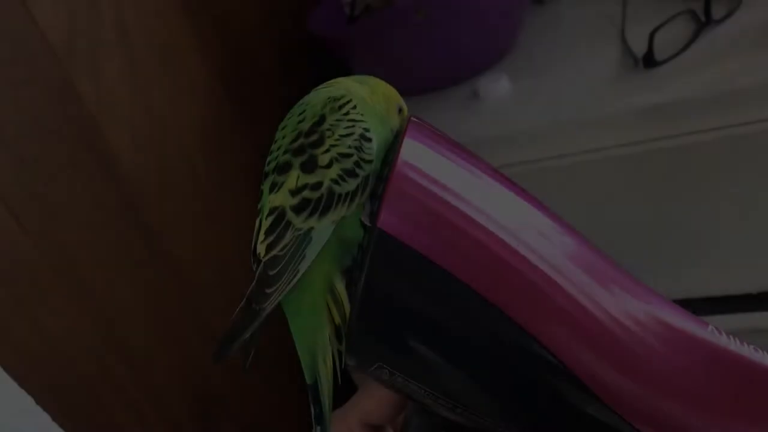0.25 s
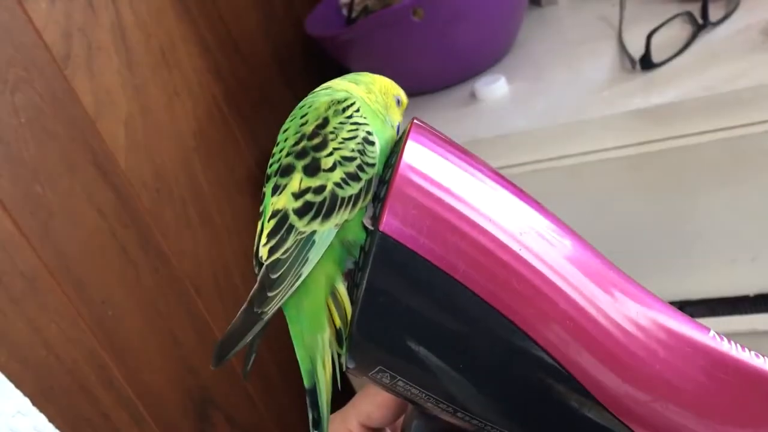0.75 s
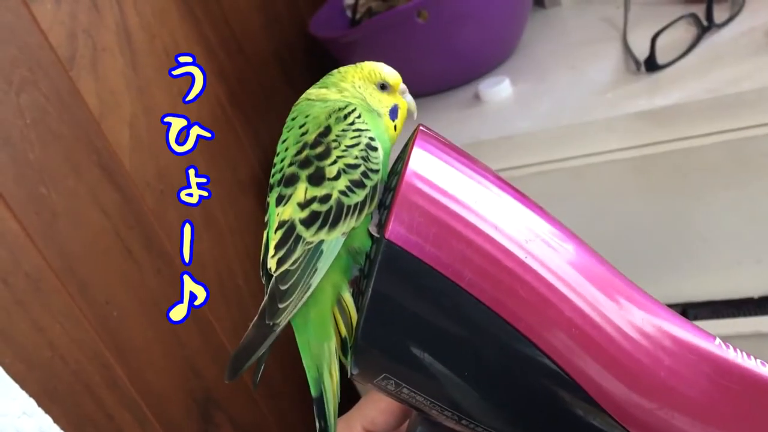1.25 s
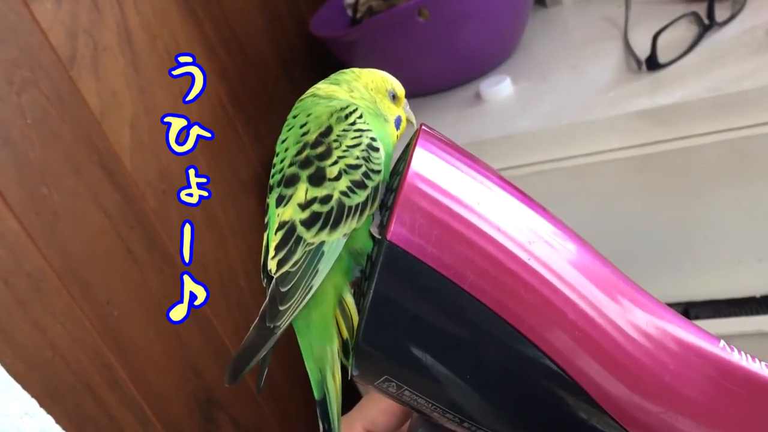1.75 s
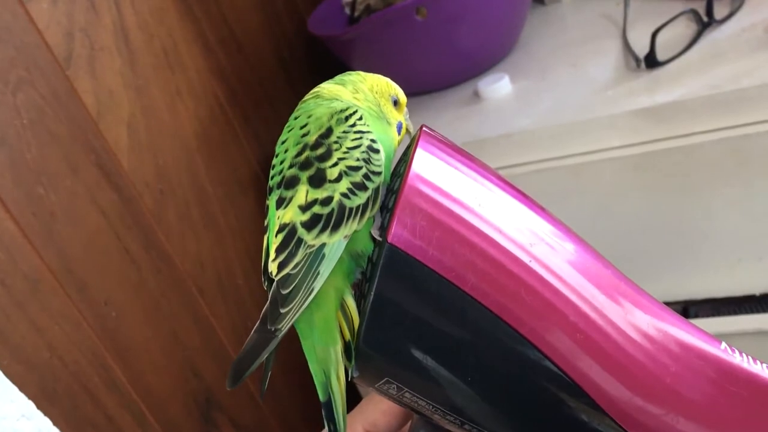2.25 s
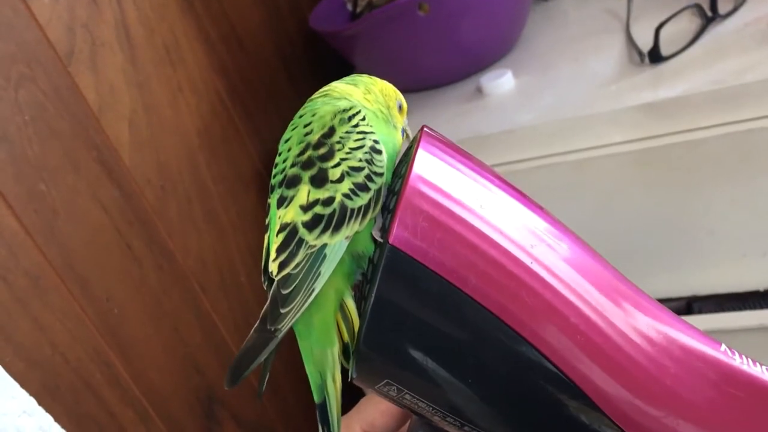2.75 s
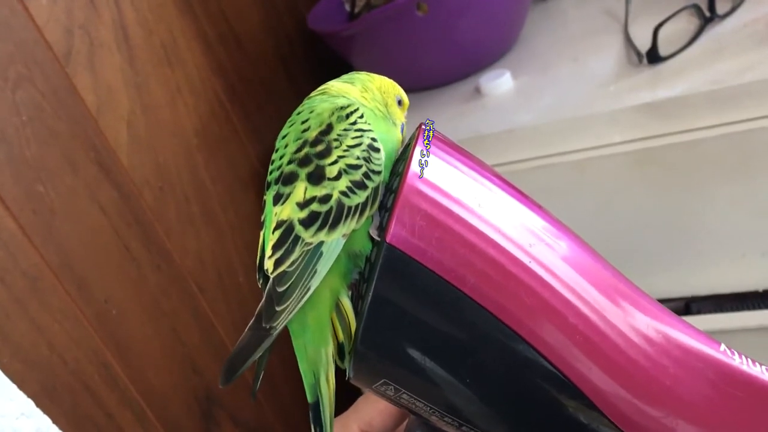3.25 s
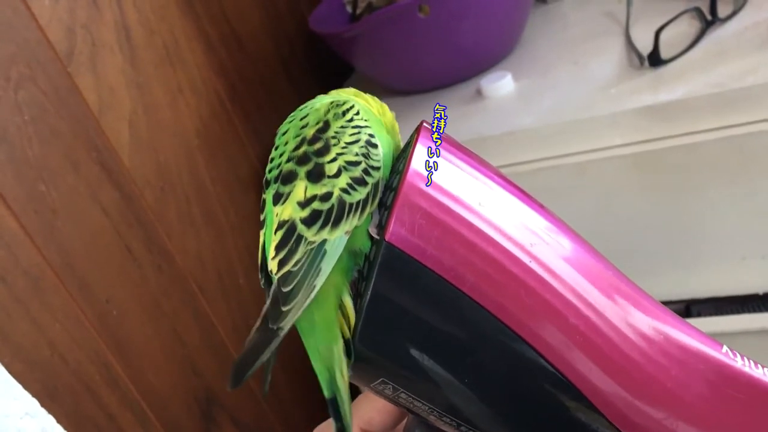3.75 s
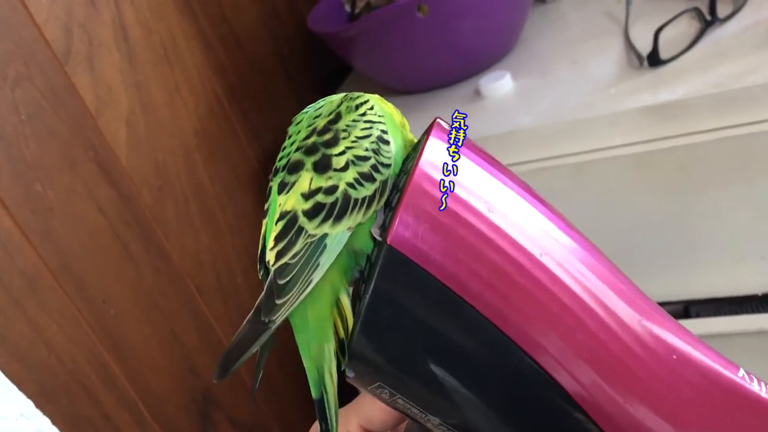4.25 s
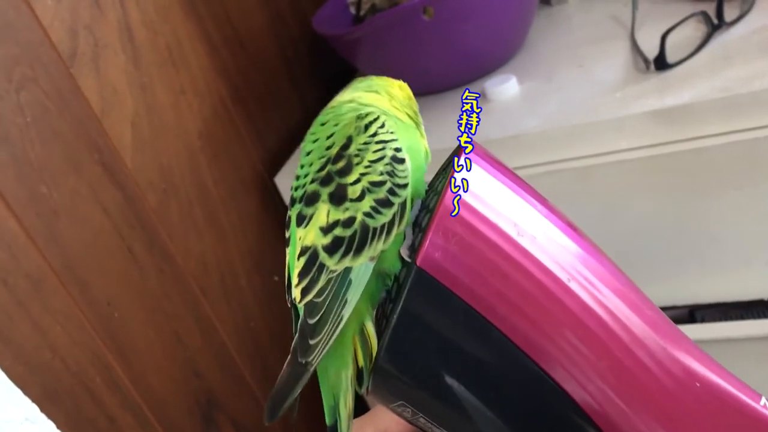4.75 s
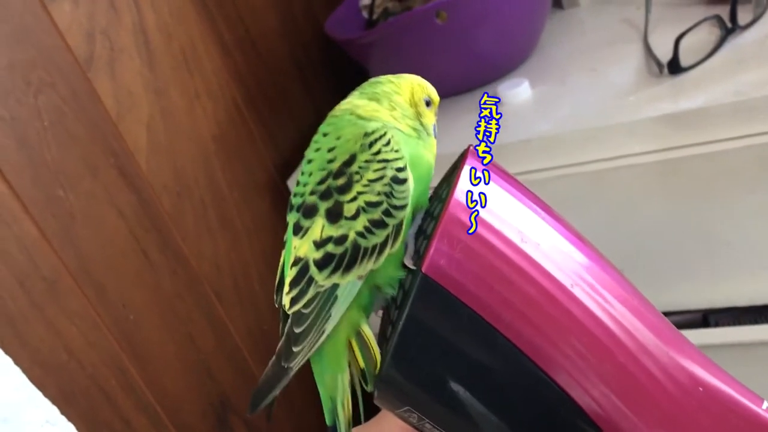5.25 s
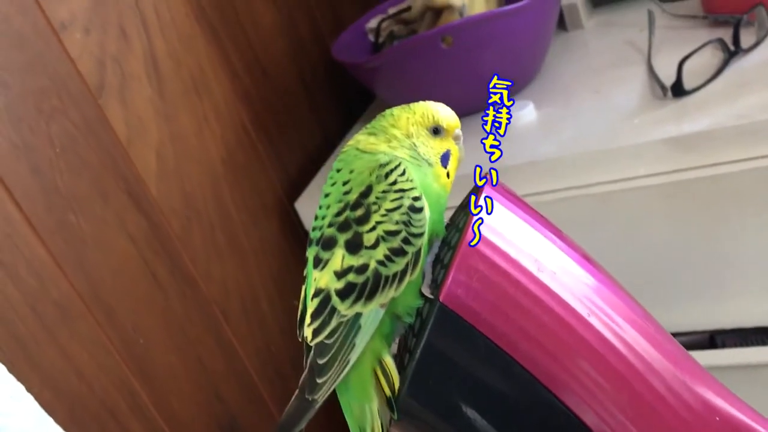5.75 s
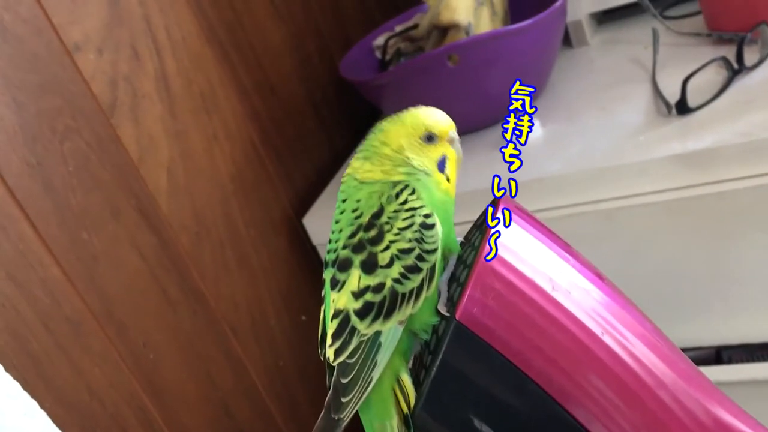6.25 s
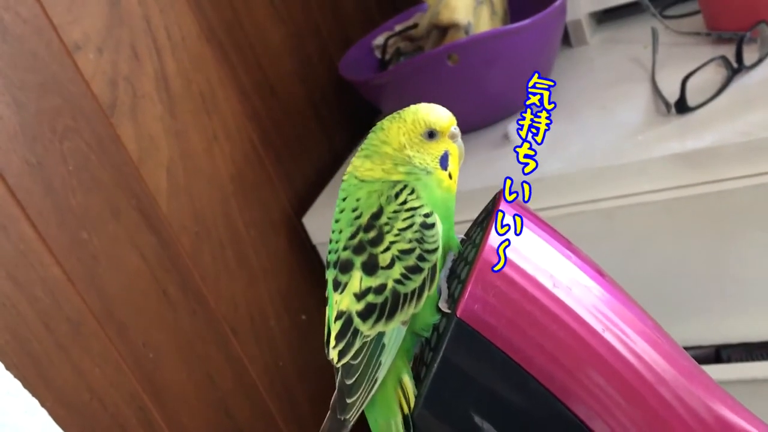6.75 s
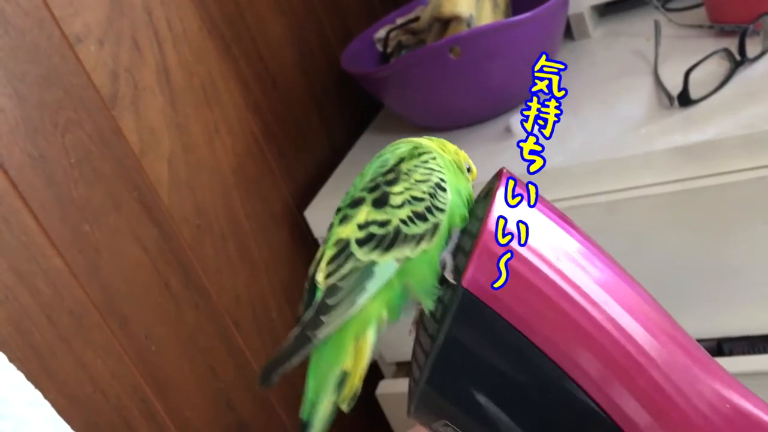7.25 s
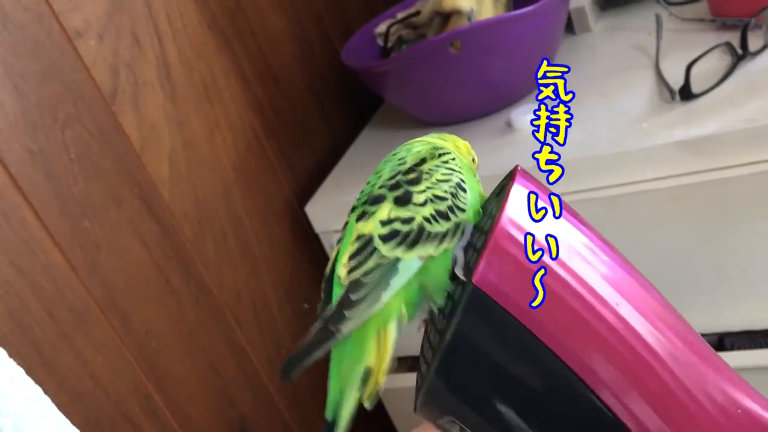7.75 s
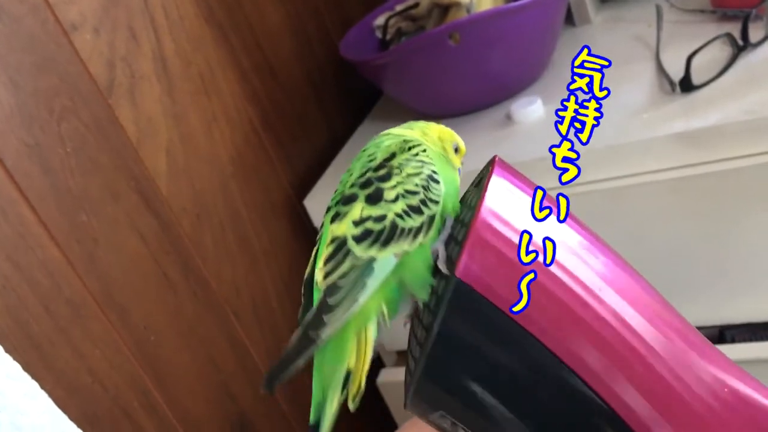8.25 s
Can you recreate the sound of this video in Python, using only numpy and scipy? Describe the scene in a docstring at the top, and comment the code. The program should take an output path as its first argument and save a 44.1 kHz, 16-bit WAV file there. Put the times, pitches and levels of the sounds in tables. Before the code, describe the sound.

A handheld hair dryer blows steadily up close in a small room, its buzzing motor hum and broad airy rush fading in from silence.

```python
"""A handheld hair dryer blows steadily in a small room, close to a phone; the sound is faded in.
Its motor sings at multiples of the shaft speed, with side tones from the rectified mains that feeds it.
Air rushes through the resonant barrel, made from filtered noise. Some tones swell or fade as the hand turns
and rocks the dryer, and the higher motor tones dim when a perched bird leans against the outlet.
Stray puffs of air reach the microphone as short, low rumbles."""
import sys
import numpy as np
from scipy import signal
from scipy.fft import rfft, irfft
from scipy.io import wavfile
from scipy.ndimage import uniform_filter1d

SR = 44100
rng = np.random.default_rng(int(sys.argv[2]) if len(sys.argv) > 2 else 0)


def persist_wave(psi):
    """Save psi, clipped to +-1, as 16-bit WAV."""
    counts = np.round(np.clip(psi, -1, 1) * 32767).astype(np.int16)
    wavfile.write(sys.argv[1], SR, np.atleast_2d(counts).T)


N = 374409  # length in samples

# Motor speed, sagging a little and recovering with the load on the fan.
# Each row: time in seconds, shaft speed in turns per second (Hz).
SHAFT_SPEED = [(0.4, 307.8), (2, 307.6), (3.5, 306.7), (4.1, 307.1), (4.65, 306.5), (6.1, 307.3),
               (7, 307.7), (7.35, 308.6), (8.2, 308.8)]

RIPPLE_HZ = 120  # pulses per second of the rectified mains
BLADES = 6  # the blade tone is this multiple of the shaft speed
WHISTLE_ORDER = 30  # the one high whistle that flares up, as a multiple of the shaft speed


def motor(shaft, ripple, turn, rock, sway_db=1.2, side_sway_db=2.5, sway_rate=8, blade_octave_db=0.7):
    """Shaft harmonics that throb with the supply, which puts side tones around each."""
    # Motor and fan tones. Each row: multiple of the shaft speed, then basic levels in dB of the tones
    # two ripples below, one below, at the centre, one above and two above.
    harmonics = [(1, -70, -64, -45, -55, -66), (2, -70, -59, -41, -49, -70), (3, -57, -48, -44, -44, -58),
                 (4, -70, -48, -43, -48, -59), (5, -70, -53, -51, -52, -70), (6, -63, -68, -39, -60, -67),
                 (7, -59, -58, -41, -51, -58), (8, -60, -58, -45, -48, -63), (9, -53, -56, -45, -55, -70),
                 (10, -57, -53, -57, -45, -54), (11, -66, -62, -49, -54, -60),
                 (12, -56, -67, -39, -62, -64), (13, -62, -61, -50, -61, -61),
                 (14, -61, -60, -56, -66, -67)]
    # Level of the blade tone, which beams at the microphone once the nozzle has turned.
    # Each row: time in seconds, change in dB.
    blade_beam = [(.6, -2), (3.5, -1), (6.1, -5), (6.4, 1), (6.95, 1.5), (7.05, 5.5), (7.6, 6), (8.1, 2)]
    # Moments when reflections cancel or reinforce the blade tone.
    # Each row: middle in seconds, length in seconds, change in dB.
    blade_fades = [(.9, .3, 5), (1.25, .4, -3.5), (3.84, .22, -18), (4.38, .2, 3), (4.73, .18, -13),
                   (5.3, .16, 7), (6.98, .06, -18), (8.3, .14, 3.5)]
    # The bird leans against the outlet and shades the short waves.
    # Each row: middle in seconds, length in seconds, change in dB at full shade.
    bird_leans = [(4.02, 0.7, -4.5), (7.75, 0.77, -4.5)]
    hum_db = -57
    shade_from_hz, shade_full_hz = 2700, 3660  # the bird's shadow starts and is complete at these pitches

    t = np.arange(N) / SR
    out = tone(ripple, hum_db)
    blade_db = curves(blade_beam)[0] + bells(t, blade_fades)
    lift_db = {BLADES: blade_db, 2 * BLADES: blade_octave_db}
    lean_db = bells(t, bird_leans)
    for multiple, *levels in harmonics:
        k = round(multiple)
        phase = k * shaft + rng.uniform(0, 2 * np.pi)
        pulse = ripple + k * np.pi / 2  # the throb of each harmonic has its own timing
        # echoes shift the side tones against their centre, which softens the throb of the higher harmonics
        smear = k / 4 * rng.standard_normal()
        sides = 0
        for ripples_away, db in zip(range(-2, 3), levels):
            if ripples_away:
                sides = sides + tone(phase + smear + ripples_away * pulse, db)
        centre = tone(phase, levels[2] + lift_db.get(k, 0)) * aim(k, turn, rock)
        share = min(k / 3, 1)  # long waves hardly notice the hand moving
        centre = centre * sway(share * sway_db, sway_rate)
        sides = sides * sway(share * side_sway_db, sway_rate)
        pitch_hz = k * SHAFT_SPEED[0][1]
        shade = undb(lean_db * np.interp(pitch_hz, [shade_from_hz, shade_full_hz], [0, 1]))
        out = out + shade * (centre + sides)
    return out


def whine(shaft, turn, rock, level_db=0.5, between_flares_db=-5, fading_db=4.5, fading_rate=3):
    """Thin high harmonics of the commutator; each is caught and lost again as the dryer moves."""
    # Commutator tones. Each row: multiple of the shaft speed, level in dB relative to the whole whine.
    whine_tones = [(15, -54), (17, -62), (18, -56), (19, -66), (20, -61), (21, -59), (22, -66), (23, -63),
                   (24, -58), (25, -62), (26, -65), (27, -65), (28, -64), (29, -65), (30, -56), (31, -66),
                   (32, -66), (33, -66), (35, -65), (37, -59), (38, -66), (40, -64), (42, -65), (46, -62)]
    # Moments when the one high whistle flares up.
    # Each row: middle in seconds, length in seconds, change in dB.
    whistle_flares = [(3, 2.2, 9), (7.215, .2, 7)]
    flare = undb(between_flares_db + bells(np.arange(N) / SR, whistle_flares))
    out = 0
    for multiple, db in whine_tones:
        k = round(multiple)
        if k == WHISTLE_ORDER:
            caught = flare
        else:
            caught = sway(fading_db, fading_rate) * aim(k, turn, rock)
        phase = k * shaft + rng.uniform(0, 2 * np.pi)
        out = out + caught * tone(phase, db + level_db)
    return out


def aim(k, turn, rock):
    """Gain of harmonic k as the nozzle turns and rocks, since some tones leave it in a beam."""
    # Directional tones. Each row: multiple of the shaft speed, change over the whole turn in dB,
    # swing with the rocking hand in dB.
    aimed_tones = [(4, 0, -2), (5, 5, 0), (7, 0, 3.5), (8, 0, -4), (9, 6, 3), (10, 7, 0), (12, 3, -3),
                   (13, 0, 3), (14, -6, 0), (18, 5, 0), (21, -8, 0), (24, -6, 0), (46, 6, 0)]
    changes_of = {multiple: changes for multiple, *changes in aimed_tones}
    turn_db, rock_db = changes_of.get(k, (0, 0))
    return undb(turn_db * (turn - .5) + rock_db * rock)


def sway(depth_db, rate):
    """Randomly wandering gain of a tone whose room reflections add and cancel as the hand moves."""
    return undb(depth_db * np.tanh(2.4 * walk(rate)))


def rush(shaft, ripple, turn, treble_hz=4000, flutter_db=0.24, hiss_flutter_db=0.61,
         shaft_depth=0.04, ripple_depth=0.03):
    """Steady turbulence in the barrel, throbbing slightly with each turn and each pulse of the supply."""
    rush_db, hiss_db = -32, 0.48  # level of the rush, average lift of its treble
    straight, turned = noise(lambda hz: barrel(hz, 0), lambda hz: barrel(hz, 1))
    air = straight + turn * (turned - straight)
    treble = signal.butter(2, treble_hz, "high", fs=SR, output="sos")
    hiss = signal.sosfiltfilt(treble, air)
    air = air + hiss * (undb(hiss_db + hiss_flutter_db * walk(45)) - 1)
    throb = 1 + shaft_depth * np.cos(shaft) + ripple_depth * np.cos(ripple)
    return air * throb * undb(rush_db + flutter_db * walk(24))


def barrel(hz, turn):
    """Gain of the air noise: a broad hump with the resonances of the barrel, seen from one nozzle angle."""
    # Turbulent air. Each row: frequency in Hz, relative level in dB.
    air_hump = [(22, -41), (42, -6.5), (70, -14.5), (150, -10), (350, -7), (550, -0.5), (900, -0.5),
                (1400, -3), (2500, -4.5), (4000, -0.5), (5000, -7), (8000, -10), (11000, -14.5),
                (15500, -17.5)]
    # Resonances of barrel and grille. Each row: frequency in Hz, width in Hz, boost in dB.
    resonances = [(645, 68, 7.5), (1057, 60, 7), (1307, 180, 7), (1514, 132, 8.5), (1895, 220, 7),
                  (2127, 88, 6), (2566, 440, 6), (3524, 350, 4.5), (5425, 114, 7), (5940, 310, 4),
                  (6410, 230, 5.5), (8600, 410, 3.5), (9500, 970, 3.5), (11530, 430, 2.5)]
    # Grille resonances that come forward or fall back as the nozzle turns.
    # Each row: frequency in Hz, width in Hz, change at a full turn in dB.
    turned_resonances = [(2840, 230, 1), (5970, 340, 2.5), (6500, 370, -2), (7050, 400, 4), (7560, 500, -2),
                         (10140, 720, -2.5), (10960, 420, 5.5), (12950, 400, 4), (13000, 4000, 1.3)]
    points, db = np.transpose(air_hump)
    hump_db = np.interp(np.log(hz), np.log(points), db)
    return undb(hump_db + bells(hz, resonances) + turn * bells(hz, turned_resonances))


def reflect(x, delays_s=(.0023, .0041), echo_db=-22, drift_s=.00006, drift_rate=0.8):
    """Floor and furniture return the rush; their paths wander with the hand, so the hiss shifts colour."""
    t = np.arange(N) / SR
    echoes = 0
    for delay in delays_s:
        heard_from = t - delay - drift_s * walk(drift_rate)
        echoes = echoes + np.interp(heard_from, t, x)
    return x + undb(echo_db) * echoes


def puffs(rise_s=0.018, width_octaves=0.43):
    """Eddies from the jet hit the microphone as soft, low thuds."""
    # Puffs of air. Each row: start in seconds, level in dB, decay time in seconds, centre pitch in Hz.
    puff_list = [(1.85, -55, 0.19, 60.5), (2.38, -50, 0.18, 69.9), (5.03, -54, 0.061, 42),
                 (5.44, -53, .1, 58.06), (7.735, -43, 0.11, 70), (7.821, -56, 0.11, 62)]
    out = 0
    for start, db, decay_s, centre_hz in puff_list:
        age = np.maximum(np.arange(N) / SR - start, 0)
        fall = np.exp(-np.maximum(age - rise_s, 0) / decay_s)
        swell = np.minimum(age / rise_s, 1) * fall
        rumble, = noise(lambda hz: np.exp(-(np.log2(hz / centre_hz) / width_octaves) ** 2 / 2))
        out = out + undb(db) * swell * rumble
    return out


def undb(db):
    """Decibels to gain."""
    return 10 ** (np.asarray(db) / 20)


def curves(table):
    """The columns of a table after its first, the time, joined by straight lines."""
    s, *columns = np.transpose(table)
    return [np.interp(np.arange(N) / SR, s, column) for column in columns]


def bells(x, table):
    """Sum of bell-shaped bumps (centre, width, dB) along frequency or time, in dB."""
    return sum(db * np.exp(-2 * ((x - centre) / width) ** 2) for centre, width, db in table)


def walk(rate):
    """Smooth random wandering with a spread near 1, from random steps at this rate per second."""
    k = max(int(SR / rate), 1)
    steps = np.repeat(rng.standard_normal(N // k + 1), k)[:N]
    smooth = uniform_filter1d(uniform_filter1d(steps, k), k)
    return 1.287 * smooth  # smoothing shrank the spread


def noise(*gains):
    """One noise heard through each of the spectra gain(Hz); the first has rms 1."""
    hz = np.maximum(np.arange(N // 2 + 1) * SR / N, 1)
    white = rfft(rng.standard_normal(N))
    shaped = np.array([irfft(white * gain(hz), N) for gain in gains])
    return shaped / np.std(shaped[0])


def tone(phase, db):
    """A sine of the given rms level."""
    return np.sqrt(2) * undb(db) * np.sin((phase % (2 * np.pi)).astype(np.float32))


def scene(jitter_hz=0.1009):
    """One shaft drives tones and air; both channels carry the same microphone."""
    # The hand. Each row: time in seconds, how far the nozzle has turned (0-1), how much it rocks (0-1).
    hand = [(3.9, .1, 0), (5.2, 0.8, 0), (6.95, 0.76, 0), (7.35, 0.8, 0.5)]
    rock_hz, rock_peak_s = 2.75, 7.91  # rocking rate, a moment when the rocking is at its peak
    t = np.arange(N) / SR
    speed_hz, = curves(SHAFT_SPEED)
    turn, rocking = curves(hand)
    rock = rocking * np.cos(2 * np.pi * rock_hz * (t - rock_peak_s))
    shaft = 2 * np.pi * np.cumsum(speed_hz + jitter_hz * walk(16)) / SR  # angle in radians
    ripple = 2 * np.pi * RIPPLE_HZ * t
    tones = motor(shaft, ripple, turn, rock) + whine(shaft, turn, rock)
    sound = tones + reflect(rush(shaft, ripple, turn)) + puffs()
    return np.array([sound, sound])


def record(dry):
    """Silence, then a straight fade-in from a low level, and a steep cut of the top."""
    start_s, full_s, first_db = 0.21, 0.69, -20
    top_hz = 15620
    fade = np.interp(np.arange(N) / SR, [start_s, full_s], [undb(first_db), 1], left=0)
    top_cut = signal.ellip(12, .1, 80, top_hz, fs=SR, output="sos")
    return signal.sosfilt(top_cut, dry * fade)


dry = scene()
out = record(dry)
persist_wave(out)
```